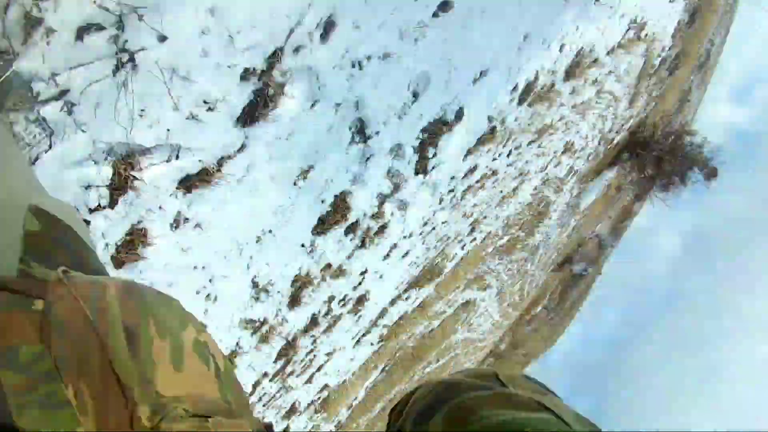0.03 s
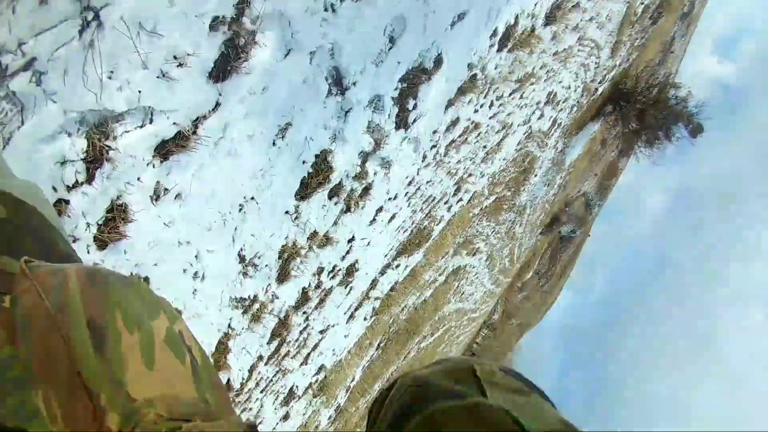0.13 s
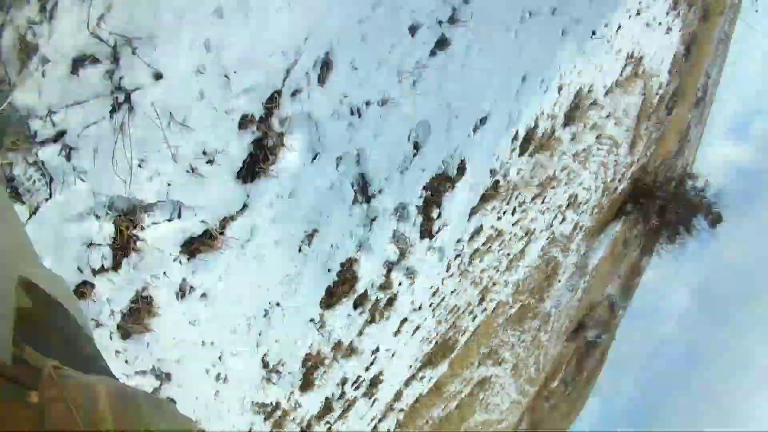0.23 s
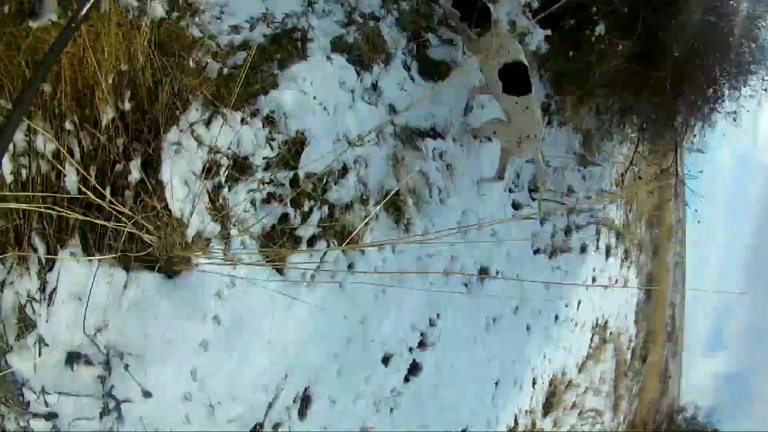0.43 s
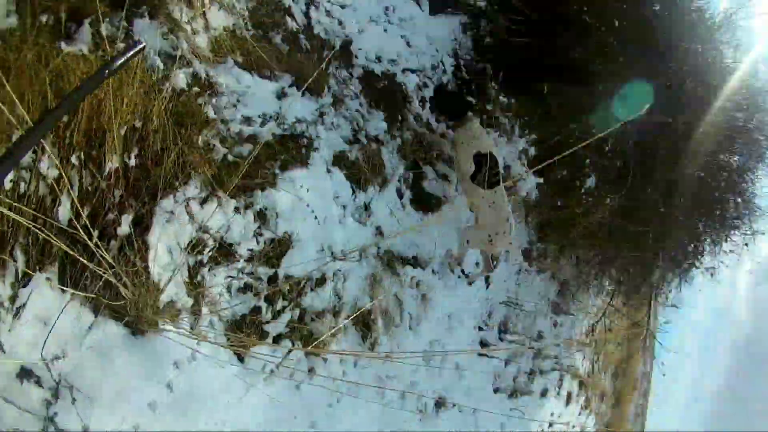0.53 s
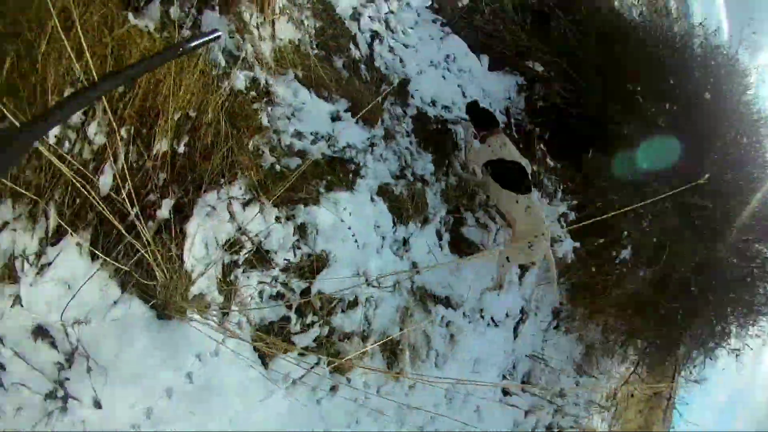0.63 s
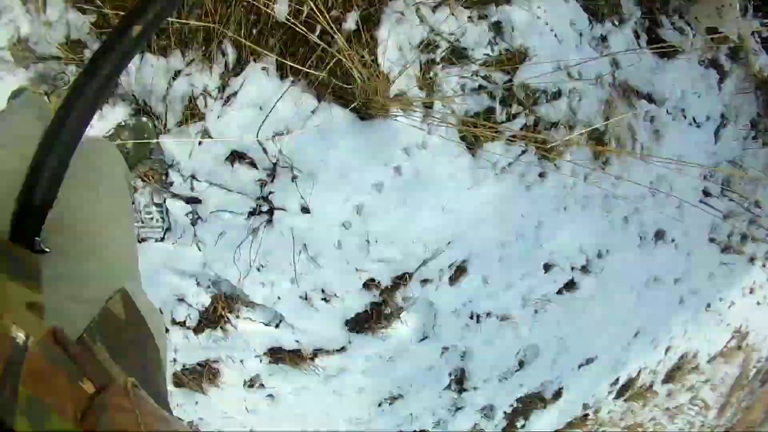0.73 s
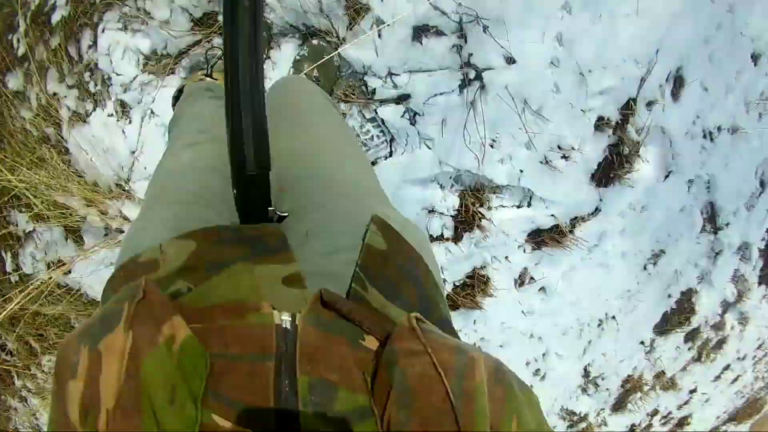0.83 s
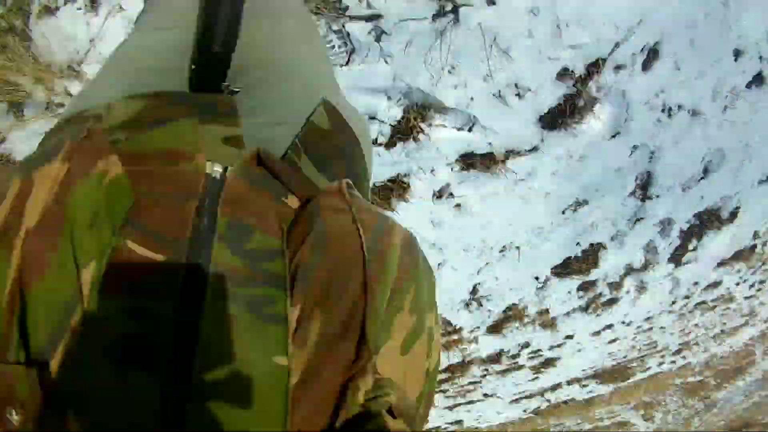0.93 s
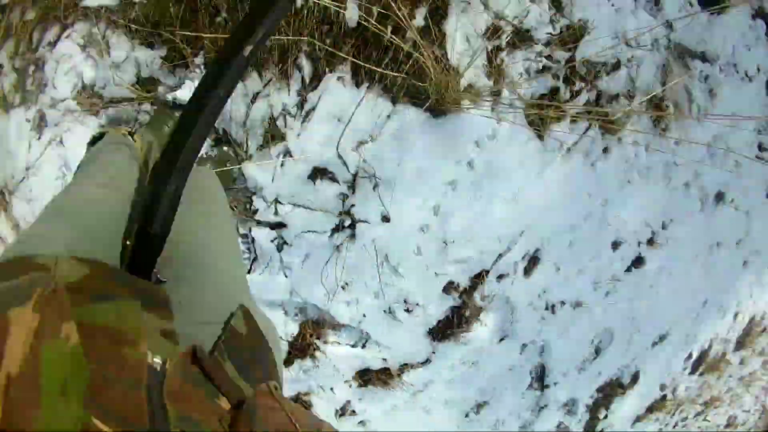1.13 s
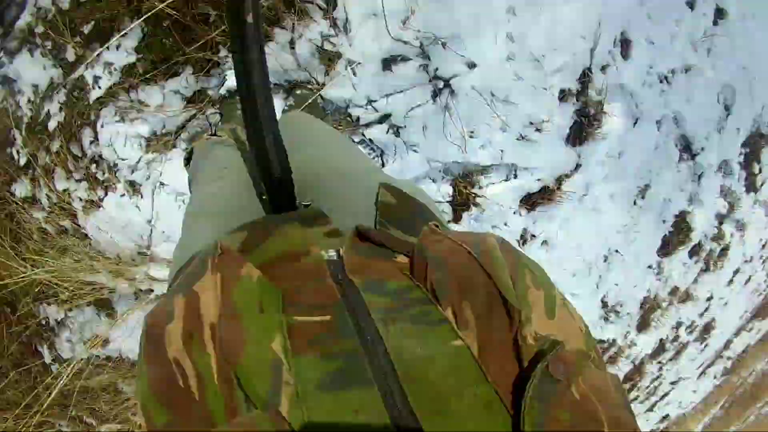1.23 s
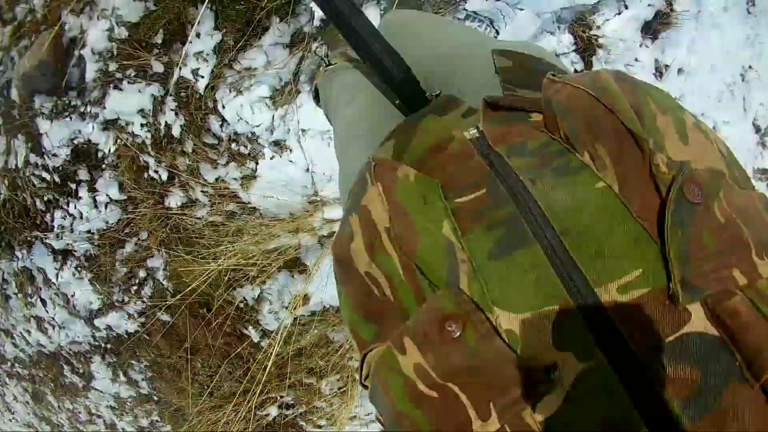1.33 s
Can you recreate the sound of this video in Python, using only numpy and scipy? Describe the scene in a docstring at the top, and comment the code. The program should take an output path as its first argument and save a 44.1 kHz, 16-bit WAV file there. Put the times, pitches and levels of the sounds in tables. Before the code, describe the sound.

One sharp knock of gear strikes a body-worn microphone, cracking loudly and dying at once. Faint muffled rustle of jacket and snow follows, with a soft footstep, small gear ticks and low wind buffets outdoors.

```python
"""A knock in snowy scrub

Someone moves through snowy scrub with a camera worn on the body. Something hard, probably carried gear,
strikes the housing once: its damped modes give a crack that overloads the microphone, and a metal part
rings on faintly. Around it are low buffets of wind, the friction noise of cloth and snow, dull bumps
of the jacket, small ticks of gear and a soft footfall."""
import sys
import numpy as np
from scipy import signal
from scipy.fft import rfft, irfft
from scipy.io import wavfile

SR = 44100
rng = np.random.default_rng(int(sys.argv[2]) if len(sys.argv) > 2 else 0)


def master(y):
    """Save y as 16-bit WAV."""
    cut = np.clip(np.atleast_2d(y).T, -1, 1)
    pcm = np.round(cut * 32767)  # scale
    wavfile.write(sys.argv[1], SR, pcm.astype(np.int16))


N = 61739
T = np.arange(N) / SR

# spectrum of rustle and crunch heard through the housing: f/Hz, relative level/dB
MUFFLING = [(100, 0.5), (300, 6), (520, -7.5), (740, 2.5), (950, -10.5), (1380, 3.5), (1800, -8),
            (2500, -19), (3100, -19), (3600, -29.5), (4350, -22.5), (5300, -40), (6300, -41), (8500, -55),
            (16000, -49)]


def undb(db):
    """Amplitude ratio of a level in decibels."""
    return 10 ** (np.asarray(db) / 20)


def unit_rms(x):
    """Normalisation to unit mean power."""
    return x / np.sqrt(np.mean(x ** 2))


def envelope(points):
    """Gain interpolated in decibels through points of t/s, level/dB."""
    return undb(np.interp(T, *np.array(points).T))


def colour(x, points):
    """Minimum-phase filtering, with unit power gain, through points of f/Hz, relative level/dB."""
    size = 4096
    hz, db = np.array(points).T
    f = np.maximum(np.fft.rfftfreq(size, 1 / SR), 1)
    magnitude = undb(np.interp(np.log(f), np.log(hz), db))
    cepstrum = irfft(np.log(magnitude))
    cepstrum[1:size // 2] *= 2  # folding onto positive time makes the filter causal
    cepstrum[size // 2 + 1:] = 0
    response = irfft(np.exp(rfft(cepstrum)))
    return signal.fftconvolve(x, response / np.linalg.norm(response))[:N]


def noise(spectrum):
    """Spectral shaping of white noise, at unit power."""
    return unit_rms(colour(rng.standard_normal(N), spectrum))


def pass_band(x, hz, kind):
    """Second-order low- or high-pass filtering."""
    return signal.sosfilt(signal.butter(2, hz, kind, fs=SR, output="sos"), x)


def decay(start, t60):
    """Exponential decay from a sudden onset, falling 60 dB in t60 seconds."""
    return (T >= start) * np.exp(-np.log(1000) * np.clip((T - start) / t60, 0, 10))


def ring(start, modes):
    """Free vibration after an impulse: a sum of damped modes given as f/Hz, level/dB, T60/s."""
    return sum(undb(db) * decay(start, t60) * np.sin(2 * np.pi * hz * (T - start))
               for hz, db, t60 in modes)


def wind():
    """Turbulent pressure on the microphone: low buffeting that rises as the wearer turns."""
    spectrum = [(15, -7), (35, 0), (75, -4.5), (130, -6.5), (200, -16.5), (330, -10.5), (520, -31.5),
                (2000, -65)]  # buffeting: f/Hz, relative level/dB
    gusts = [(0, -67), (.03, -50.5), (.2, -50.5), (.28, -46), (.42, -61.5), (.64, -62.5), (.75, -79),
             (.8, -61.5), (.9, -52), (.98, -36.5), (1.03, -47.5), (1.08, -40), (1.15, -50), (1.24, -40),
             (1.31, -65.5), (1.39, -39)]  # strength of the wind: t/s, level/dB
    return noise(spectrum) * envelope(gusts)


def rustle(slips_per_s=1700, spread_db=4):
    """Stick-slip friction: cloth and snow give dense random impulses, muffled by the housing."""
    movement = [(0, -46), (.04, -48), (.115, -45), (.16, -50.5), (.21, -55.5), (.3, -50.5), (.38, -59.5),
                (.64, -60), (.68, -52.5), (.76, -51.5), (.8, -61.5), (.89, -52), (.96, -47), (1.04, -48.5),
                (1.13, -53.5), (1.245, -48.5), (1.29, -57.5), (1.36, -61.5), (1.39, -50)]  # strength of the rustle: t/s, level/dB
    slips = (rng.random(N) < slips_per_s / SR) * rng.choice([-1, 1], N)
    sizes = undb(spread_db * np.clip(rng.standard_normal(N), -2, 2))
    return unit_rms(colour(slips * sizes, MUFFLING)) * envelope(movement)


def sleeve(level_db=-58, hold_s=0.053, fade_s=0.0095):
    """Sliding friction: a sleeve gives a short swish of bright noise at the start."""
    spectrum = [(1500, -4), (3000, 0), (3600, -9), (4300, 1.5), (5300, -17), (6200, -6.5), (7500, -26),
                (15000, -14)]  # sliding cloth: f/Hz, relative level/dB
    sliding = np.clip((hold_s - T) / fade_s + 1, 0, 1)
    return undb(level_db) * noise(spectrum) * sliding


def jacket_bumps():
    """Soft impacts: each bump of the jacket against the camera excites one low damped mode."""
    bumps = [(.017, 70, -32, .06), (0.927, 100, -34, 0.14), (.751, 60, -44.5, 0.088),
             (0.97, 54.6, -25, 0.051), (1.064, 97, -26.5, 0.045), (1.112, 93, -29.5, 0.07),
             (1.208, 70, -33, 0.1), (1.2376, 283, -30, 0.019)]  # dull thuds: t/s, f/Hz, level/dB, T60/s
    return sum(ring(start, [(hz, db, t60)]) for start, hz, db, t60 in bumps)


def gear_ring(attack_s=0.00094):
    """Modal ringing of one piece of gear, its onset cushioned by cloth."""
    modes = [(720, -17, .016), (1200, -6, 0.017), (1386, 0.5, 0.019), (1719, -0.5, 0.028),
             (3000, -33, 0.016), (4300, -32, .009)]  # resonances of the gear: f/Hz, relative level/dB, T60/s
    t = T[:SR // 20]
    tone = sum((-1) ** k * undb(db) * np.exp(-np.log(1000) * t / t60) * np.sin(2 * np.pi * hz * t)
               for k, (hz, db, t60) in enumerate(modes))
    onset = 1 - np.exp(-t / attack_s)
    return np.pad(tone * onset, (0, N - len(t)))


def gear_ticks(attack_s=0.00091):
    """Small impacts: each is a noisy crunch, muffled by the housing, plus the free ring of the gear."""
    # ticks and crunches: t/s, level/dB, treble gain/dB, bass gain/dB, ring gain/dB,
    # ring frequency ratio, crunch T60/s
    ticks = [(.0922, -26, -18, -21, -8.5, 1.02, 0.027), (0.1669, -40, 2, 8, -5.5, 1, 0.012),
             (0.1795, -42, -10, 8, -22, 1.2, 0.013), (0.2521, -23, 0.5, -16.5, -17, 1, .022),
             (.298, -48.5, -14, 3, -10, .9, 0.056), (0.3446, -41, -7, 5, -6, 0.75, 0.024),
             (.4075, -49, -5.5, -15, -7.5, 0.72, 0.019), (0.439, -51, -7, -8, 1, 1.06, 0.014),
             (0.4991, -44.5, -1, 7, -15, 0.81, 0.025), (.591, -52, -5.5, 3.5, -8, 1.32, 0.022),
             (0.6656, -44.5, 6.5, 3, -15, 0.62, 0.075), (0.693, -53, 12.5, 3.5, -4, 0.82, .05),
             (0.7034, -37.5, -9, -6, -12, 0.96, 0.049), (0.7435, -42.5, -3, -2, -4.5, 0.82, 0.017),
             (0.8202, -52, 1, 11.5, -1, 1, 0.033), (0.8712, -38, -18, 8.5, -16, .95, 0.027),
             (0.9096, -29.5, -12, -5, 6, 0.98, 0.019), (0.9224, -41.5, -8, 7.5, -17, 0.67, 0.019),
             (.9467, -39, -10.5, 11.5, -9, 1.14, 0.017), (0.9684, -34, -17, 5, -3, .95, .014),
             (0.988, -33.5, -20, 7.5, 3.5, 1.03, 0.014), (1.0135, -35.5, -10.5, -3, -2.5, .95, 0.011),
             (1.067, -31.5, -6.5, -4, 6, 1.03, 0.016), (1.0775, -27, 6, -9, -4, 1, 0.013),
             (1.1069, -37.5, -9, -10, 4, 0.95, 0.019), (1.1505, -34, -4, -16, -0.5, .93, .018),
             (1.169, -41.5, -0.5, 4, -5, 1.23, 0.071), (1.1824, -37.5, -12, -2, 6, 0.99, 0.026),
             (1.2251, -33.5, 5.5, -13, 8.5, 1.019, 0.021), (1.2625, -41, 7, -16, -1.5, 0.96, 0.014),
             (1.319, -44, 4.5, -15, -11, 0.93, 0.024)]
    bass, middle, treble, rings = np.zeros((4, N))
    grit, tone = rng.standard_normal(N), gear_ring()
    for start, db, treble_db, bass_db, ring_db, pitch, t60 in ticks:
        onset = np.clip((T - start) / attack_s, 0, 1)
        burst = undb(db) * grit * decay(start, t60) * onset
        middle += burst
        bass += undb(bass_db) * burst
        treble += undb(treble_db) * burst
        rings += undb(db + ring_db) * np.interp((T - start) * pitch, T, tone, left=0)
    bass = pass_band(bass, 520, "low")
    middle = pass_band(pass_band(middle, 650, "high"), 1800, "low")
    treble = pass_band(treble, 2500, "high")
    crunch = bass - middle + treble  # inverting the middle avoids notches at the crossovers
    return colour(crunch, MUFFLING) + rings


def knock(scrape_db=-15, scrape_s=0.0043):
    """Impact excitation: a blow and its rebound drive the housing's modes; grit scrapes, metal rings."""
    contacts = [(.2349, 1.5), (.23572, -4.5)]  # the blow and its instant rebound: t/s, level/dB
    housing_modes = [(250.7, -32.5, 0.0038), (745, -8.5, 0.0453), (1001, -12, 0.028), (1258, -3.5, 0.011),
                     (1469, -2, 0.011), (1537.3, 2, 0.023), (1666, 1.14, 0.023), (1923, 8, 0.0149),
                     (2533, -4, 0.0145), (2878, 4.5, 0.012), (3236, -12.5, 0.022), (4050, 2, 0.011),
                     (4400, -21.5, 0.023), (6490, -5, 0.0092)]  # heavily damped resonances: f/Hz, relative level/dB, T60/s
    metal_modes = [(334, -46, .4), (641, -53, 2.2), (1393, -41, .5), (1588, -22, .15)]  # lightly damped resonances: f/Hz, level/dB, T60/s
    grit_spectrum = [(100, -19.5), (1500, -11.5), (2800, -2), (3500, -8), (4100, 6), (5200, -0.5),
                     (6900, -7), (7900, -22), (15000, -20)]  # grit scraped in the contact: f/Hz, relative level/dB
    start = contacts[0][0]
    crack = sum(undb(db) * ring(at, housing_modes) for at, db in contacts)
    progress = np.clip((T - start) / scrape_s, 0, 1)
    touching = np.sqrt(np.maximum(np.sin(np.pi * progress), 0))
    scrape = undb(scrape_db) * touching * noise(grit_spectrum)
    return crack + scrape + ring(start, metal_modes)


def footfall(start_s=0.6742):
    """A soft impact: one step sets off low, quickly damped modes."""
    modes = [(99, -39, 0.15), (257, -26.5, 0.069), (456, -41, 0.027)]  # thud of the step: f/Hz, level/dB, T60/s
    return ring(start_s, modes)


def scene():
    """Linear superposition of all sources in one channel."""
    return (wind() + rustle() + sleeve() + jacket_bumps() + gear_ticks() + knock() + footfall())[None]


def record(dry, knee=4, ceiling_db=-1.15, hiss_db=-78, mic_hz=10200, top_hz=15800):
    """Saturation and band limiting: the microphone flattens the crack, adds hiss and loses the top."""
    saturated = dry / (1 + np.abs(dry) ** knee) ** (1 / knee)
    softened = undb(ceiling_db) * pass_band(saturated, mic_hz, "low")
    hiss = undb(hiss_db) * rng.standard_normal(N)
    steep_lowpass = signal.ellip(8, .2, 70, top_hz, fs=SR, output="sos")
    return signal.sosfilt(steep_lowpass, softened + hiss)


dry = scene()
out = record(dry)
master(out)
```